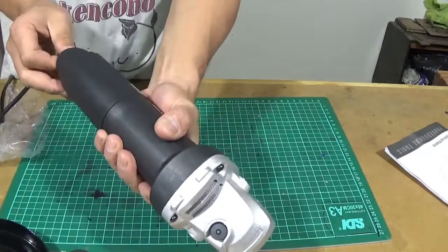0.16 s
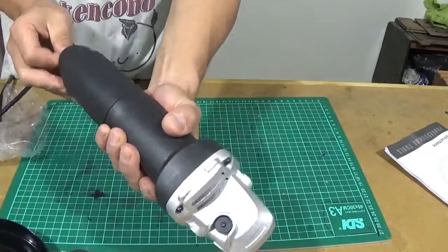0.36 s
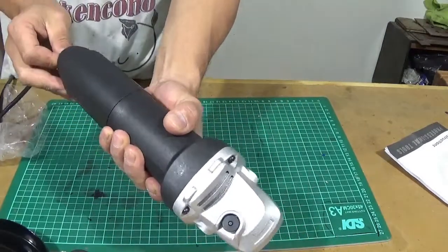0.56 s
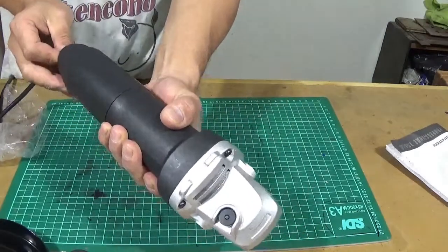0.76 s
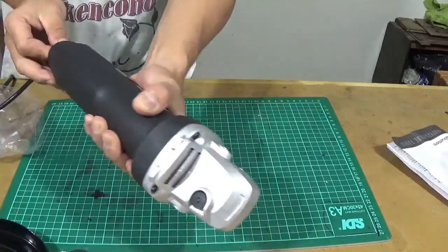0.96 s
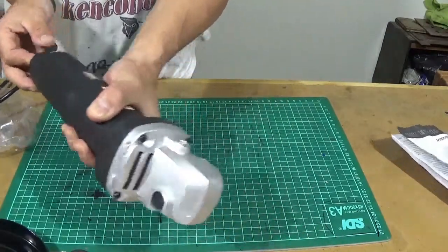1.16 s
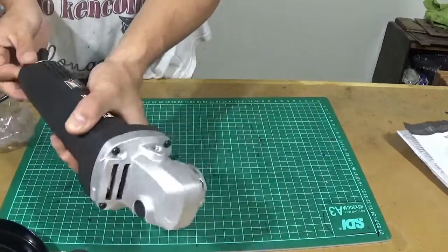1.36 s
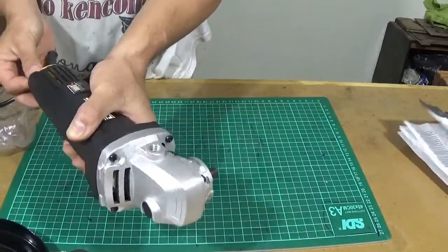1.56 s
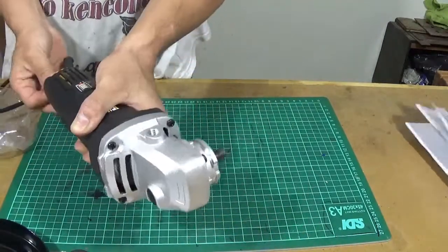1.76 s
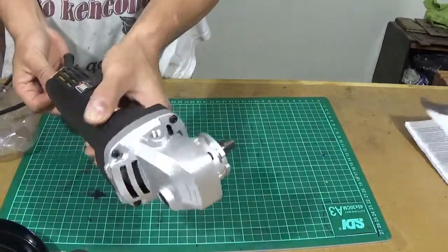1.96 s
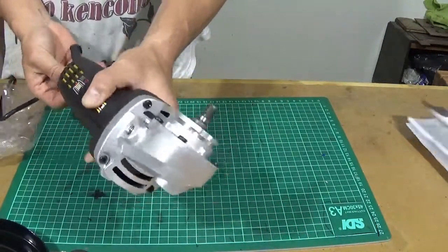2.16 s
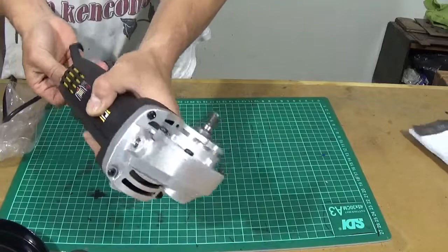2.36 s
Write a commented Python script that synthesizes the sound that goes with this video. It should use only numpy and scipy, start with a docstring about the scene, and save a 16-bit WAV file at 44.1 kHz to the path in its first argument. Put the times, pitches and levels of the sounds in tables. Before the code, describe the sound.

An electric angle grinder without a disc snaps on and runs with a loud rushing whir

```python
"""An angle grinder with no disc is held over a workbench, close to a microphone. The motor runs up and its
speed swings slowly. Fan air and gear chatter, made from noise and random hits, rush through the casing.
Shaft, gear and fan tones follow the speed, and the brushes squeal in time with the mains.
The switch ticks and snaps on before the run; as the tool is turned, its vents puff air at the microphone.
Behind it lie quiet workshop air, a low hum and faint electrical chirps."""
import sys
import numpy as np
from scipy import signal
from scipy.fft import rfft, irfft, next_fast_len
from scipy.io import wavfile
from scipy.ndimage import uniform_filter1d

SR = 44100
rng = np.random.default_rng(int(sys.argv[2]) if len(sys.argv) > 2 else 0)


def wrap_up_sound(samples):
    """Save the sound to the file named by the first command line argument, as 16-bit audio."""
    columns = np.atleast_2d(samples).T
    # keep every value between -1 and 1, then stretch to whole-number steps
    tamed = np.clip(columns, -1, 1)
    steps = np.round(tamed * 32767).astype(np.int16)
    wavfile.write(sys.argv[1], SR, steps)


N = 110250
TIME = np.arange(N) / SR  # seconds

# Switch closing, then power pulsing with the mains
ON_S, PULSE_HZ, PULSE_PEAK_S = 0.3035, 101, .3275
# Extra pulsing of the rush at the start, its fading time, and the pulsing that stays
SURGE_DEPTH, SURGE_S, RUN_DEPTH = 0.74, 0.044, 0.023

# Rush colour with the top of the tool facing the microphone [f/Hz, relative level/dB per Hz]
RUSH_TOP = [(24, -70), (40, -38), (212, -41), (364, -24.5), (400, -27), (543, -16.5), (911, -12.5),
            (1210, -12), (1420, -9), (1880, -8), (2170, -6), (3240, -2.5), (3850, -3), (4400, -6),
            (5500, -4), (6650, -6), (7200, -4.5), (9550, -4.5), (10150, -6), (10900, -9), (14300, -81)]
# Rush colour with the vents facing the microphone [f/Hz, relative level/dB per Hz]
RUSH_VENTS = [(24, -66), (40, -32), (217, -39), (382, -29.5), (543, -17), (810, -18), (978, -14),
              (1460, -11), (1560, -7.5), (1930, -9), (2170, -5.5), (2880, -3.5), (3480, -2), (4300, -2.5),
              (5000, -3.5), (6650, -5), (7400, -1.8), (8500, -5), (9550, -3), (10100, -5), (10900, -9),
              (14300, -52)]
TURN_FROM_S, TURN_TO_S = 1.66, 1.67
# Rush loudness in four bands [t/s, low level/dB, middle level/dB, treble level/dB, top level/dB]
RUSH_LEVELS = [(0.31, -15.5, -27, -24, -35), (.318, -22, -27, -14.5, -24), (.34, -24, -22, -19, -22.5),
               (.37, -22, -17.5, -20, -20), (.44, -21, -20, -21, -17), (.6, -20, -19.5, -19.5, -17),
               (1.0, -21, -20.5, -17.5, -17.5), (1.2, -22.5, -20, -19, -17.5), (1.45, -25, -19.5, -21, -17),
               (1.65, -18, -19.5, -21, -17.5), (1.82, -15.5, -19, -19.5, -17.5),
               (2.0, -18, -18, -19.5, -16.5), (2.25, -17, -20, -18.5, -18.5),
               (2.48, -18.5, -17.5, -20, -17.5)]
# Centres of those four bands [f/Hz]
BAND_HZ = [1000, 3200, 5800, 9000]
# Thinning of the rush in the bass [f/Hz, gain/dB]
RUSH_LOW_CUT = [(100, -11), (250, 1.5), (420, -3), (520, -4.5), (700, 0), (11000, 0)]
# Gear hits: rate, average extra strength, share of the rush power
CHATTER_PER_S, CHATTER_SPREAD_DB, CHATTER_SHARE = 4000, 3, 0.25
FLUTTER_DB, PATCHES_DB = 0.11, 0.87  # rms unsteadiness of the rush: overall, and in patches of colour
# Casing resonances [f/Hz, width/Hz, average level/dB]
CASING = [(700, 19, -57.5), (995, 16, -54.5), (1114, 21, -50.5), (1211.5, 38, -50.5), (1323, 23, -62),
          (1610, 30, -49.5), (2010, 60, -44.5), (2206, 51, -41.5), (2800, 60, -40), (2902, 57, -40),
          (3130, 67, -47), (3665, 71, -41), (3890, 50, -40.5), (4105, 80, -40.5), (4630, 39, -44.5)]
CASING_SWING_DB, CASING_SWING_HZ = 2.5, 4
# Bands of the rush that swell briefly at their own pitches
# [middle t/s, length/s, f/Hz, width/Hz, peak level/dB]
SWELLS = [(0.325, 0.032, 1950, 300, -28), (0.38, 0.042, 3820, 250, -37), (0.49, 0.32, 2960, 352, -29),
          (.56, .1, 6150, 250, -35), (0.61, 0.26, 9320, 600, -29), (0.73, 0.17, 3670, 400, -29),
          (0.822, .08, 6040, 400, -28.5), (.95, .1, 4880, 350, -30), (0.997, .12, 7200, 250, -32),
          (1.07, 0.25, 9830, 400, -36), (1.457, 0.45, 2340, 350, -32), (1.48, 0.18, 9470, 250, -30),
          (1.618, 0.12, 9250, 250, -25.5), (1.77, .11, 4590, 300, -29.5), (1.902, .2, 2980, 252, -36),
          (1.92, 0.28, 3550, 250, -34.5), (1.97, 0.16, 3900, 302, -31), (2.299, 0.038, 3660, 300, -25.5),
          (2.3, .2, 5700, 500, -34)]

# Motor speed [t/s, turns per second/Hz]
SPEED = [(.33, 330), (.42, 420), (.5, 470), (.6, 514), (.66, 538), (.73, 561), (.85, 587), (.95, 603),
         (1.06, 616), (1.2, 580), (1.38, 536), (1.52, 499), (1.63, 480), (1.8, 510), (1.95, 565),
         (2.1, 596), (2.3, 624), (2.5, 626)]
# Overtones of shaft and gears [multiple of the speed, level/dB]
OVERTONES = [(2, -51.5), (3, -48), (4, -52.5), (9, -42), (12, -41)]
# Shaft and fan tones as the tool turns [t/s, shaft level/dB, fan level/dB]
TONE_LEVELS = [(.35, -70, -48), (.55, -55, -43), (.66, -53, -38), (.74, -50, -35.5), (.82, -56, -33),
               (1.07, -55, -32), (1.17, -55, -36), (1.28, -51, -42), (1.38, -52, -43), (1.44, -58, -44),
               (1.52, -53, -44), (1.66, -60, -43), (1.78, -52, -38), (1.86, -54, -37), (1.95, -50, -35),
               (2.1, -56, -37), (2.5, -60, -42)]
SHAFT_JITTER, OVERTONE_ROUGHNESS = 0.0043, 1  # rms share of the speed, rms share of the tone
# Fan: multiple of the speed, width of its noisy tone, strength of its clean tone next to it
FAN_ORDER, FAN_WIDTH_HZ, FAN_STEADY = 6, 80, .7
# Air swirling round the rotor, just above its turning rate; the level holds at the reference speed
SWIRL_DB, SWIRL_RATIO, SWIRL_WIDTH_HZ, SWIRL_REFERENCE_HZ = -56.5, 1.17, 140, 563
RUMBLE_DB, RUMBLE_HZ, RUMBLE_WIDTH_HZ = -74, 35, 57  # rumble of the running motor

# Brush squeal [t/s, level/dB]
SQUEAL = [(.305, -40), (.33, -19), (.35, -27), (.385, -21), (.41, -29), (.47, -32), (.6, -31), (.9, -44)]
# Starting pitch, how far it sags, how quickly, and its rms pitch wobble
SQUEAL_HZ, SQUEAL_SAG_HZ, SQUEAL_SAG_S, SQUEAL_WOBBLE_HZ = 6544, 395, 0.076, 73.4

# Switch ticks and snaps [start t/s, level/dB, ring f/Hz, decay/s]
KNOCKS = [(0.036, -51, 3800, 0.001), (0.1746, -43.5, 6400, 0.0015), (0.1877, -44.5, 6000, 0.0017),
          (.2008, -55, 2060, 0.002), (.2094, -46, 6200, 0.0016), (0.2902, -46, 6600, 0.0016),
          (0.2947, -35, 4000, 0.004), (0.2975, -16, 3500, 0.0012), (0.3026, -17.5, 6800, 0.00088),
          (0.3032, -20.5, 1640, 0.0013)]
# Colour of the noisy crack [f/Hz, relative level/dB]
KNOCK_COLOUR = [(100, -26), (1000, -17), (3000, -2), (5000, 6), (7000, 2), (11000, -7)]
# Thinning of the knocks in the bass [f/Hz, gain/dB]
KNOCK_LOW_CUT = [(150, -30), (400, -16), (1000, -9.5), (11000, 2)]
# Ring strength next to the crack, rms pitch wobble, rise time
KNOCK_RING, KNOCK_WOBBLE_HZ, KNOCK_RISE_S = 1.2, 613, .0009

# Vent air buffeting the microphone [middle t/s, length/s, level/dB]
PUFFS = [(2.16, 0.042, -40.5), (2.206, 0.018, -30), (2.227, 0.014, -28), (2.264, 0.034, -35),
         (2.315, 0.02, -29.5), (2.344, 0.044, -43), (2.407, 0.037, -39.5)]
# Colour of the puffs [f/Hz, relative level/dB]
PUFF_COLOUR = [(30, -36), (70, -21), (130, -8.5), (250, -4.5), (450, -0.5), (650, -8.5), (1200, -12),
               (4000, -62)]
# How alike left and right are in a puff [f/Hz, likeness from 0 to 1]
PUFF_LIKENESS = [(60, 0.86), (140, .7), (260, .1), (700, 0.16)]

# Colour of the quiet workshop air [f/Hz, relative level/dB per Hz]
FLOOR = [(30, -30), (70, -6.5), (105, -4), (150, -15.5), (190, -9.5), (300, -10.5), (660, -11.5),
         (1400, -15), (2500, -15.5), (5000, -20), (11000, -24)]
FLOOR_DB = -62.5
# Hum tones [f/Hz]
HUM_HZ = [113, 184]
# Hum tones before the switch closes [level/dB]
HUM_DB = [-72, -70]
HUM_FADE_DB = -5  # change once the switch is on
# Faint electrical chirps [middle t/s, level/dB]
CHIRPS = [(0.02, -56.5), (.060, -57), (.100, -58), (.141, -56), (.181, -57), (.261, -58)]
CHIRP_HZ, CHIRP_S = 2840, 0.012
# The grip shifts on the body with a soft bump
GRIP_S, GRIP_LENGTH_S, GRIP_HZ, GRIP_DB = 0.233, .04, 110, -61
# The thumb rubs on the switch
RUB_S, RUB_LENGTH_S, RUB_DB = 0.22, .04, -65

# How alike left and right are elsewhere [f/Hz, likeness from 0 to 1]
LIKENESS = [(60, 0.97), (270, 1), (570, 0.79), (1200, 0.94), (2550, 1), (5400, 0.95), (9000, 0.96),
            (11400, 1)]
ROOM_DB, ROOM_T60 = -11.5, 0.29  # T60 in seconds: the time to fall by 60 dB
LAG_S, LEFT_DB, RIGHT_DB, EDGE_HZ = .00002, -0.23, .5, 11090


def amp(db):
    """Turns decibels into a gain."""
    return 10 ** (np.asarray(db) / 20)


def unit(x):
    """Scales to rms 1."""
    return x / np.sqrt(np.mean(x ** 2) + 1e-20)


def read(points, hz):
    """Reads a curve between its points on a log-frequency axis."""
    f, value = np.transpose(points)
    return np.interp(np.log(hz + 1), np.log(f + 1), value)


def filtered(x, gain):
    """Applies a gain that is a function of frequency."""
    size = next_fast_len(N + 8192)
    return irfft(rfft(x, size) * gain(np.fft.rfftfreq(size, 1 / SR)), size)[..., :N]


def coloured(x, points):
    """Gives white noise a colour below the band edge, keeping its power."""
    return filtered(x, lambda hz: unit(amp(read(points, hz)) * (hz < EDGE_HZ)))


def wander(rate_hz):
    """Random wandering of rms 1; a higher rate makes it quicker."""
    return unit(filtered(rng.standard_normal(N), lambda hz: np.exp(-(hz / rate_hz) ** 2)))


def resonate(x, hz, width_hz):
    """A fixed or moving resonance of rms 1: shift down to zero, smooth twice, shift back."""
    turn = np.exp(2j * np.pi * np.cumsum(hz * np.ones(x.shape[-1])) / SR)
    r = np.exp(-np.pi * width_hz / SR)
    smooth = signal.lfilter([(1 - r) ** 2], [1, -2 * r, r * r], x * turn.conj())
    return unit((turn * smooth).real)


def pair(two, likeness=LIKENESS):
    """Mixes two unrelated signals into a partly alike left and right."""
    angle = lambda hz: np.arccos(np.clip(read(likeness, hz), 0, 1)) / 2
    mid = filtered(two[0], lambda hz: np.cos(angle(hz)))
    side = filtered(two[1], lambda hz: np.sin(angle(hz)))
    return np.array([mid + side, mid - side])


def noise_pair():
    """White noise for left and right, partly alike."""
    return pair(rng.standard_normal((2, N)))


def bump(centre_s, length_s):
    """A smooth swell that is length_s wide at half height."""
    return np.cos(np.pi / 2 * np.clip((TIME - centre_s) / length_s, -1, 1)) ** 2


def power(depth):
    """Off until the switch closes, then pulsing with the mains."""
    switched_on = np.clip((TIME - ON_S) / 0.0023, 0, 1)
    return switched_on * (1 + depth * np.cos(2 * np.pi * PULSE_HZ * (TIME - PULSE_PEAK_S)))


def rush():
    """Fan turbulence and chattering gear teeth, pulsing most at the start, coloured and rung by the casing."""
    strength = amp(CHATTER_SPREAD_DB * np.minimum(rng.exponential(1, (2, N)), 4))
    hits = (rng.random((2, N)) < CHATTER_PER_S / SR) * strength
    chatter = unit(hits * rng.choice([-1, 1], (2, N)))
    turbulence = rng.standard_normal((2, N))
    mixed = np.sqrt(CHATTER_SHARE) * chatter + np.sqrt(1 - CHATTER_SHARE) * turbulence

    surge = RUN_DEPTH + SURGE_DEPTH * np.exp(-np.maximum(TIME - ON_S, 0) / SURGE_S)
    effort = power(surge) * amp(FLUTTER_DB * wander(rate_hz=39))
    drive = effort * pair(mixed)
    turned = np.interp(TIME, [TURN_FROM_S, TURN_TO_S], [0, 1])
    facing = (1 - turned) * coloured(drive, RUSH_TOP) + turned * coloured(drive, RUSH_VENTS)

    s, *levels = np.transpose(RUSH_LEVELS)
    air = 0
    for db, band in zip(levels, np.eye(len(BAND_HZ))):  # overlapping bands that add up to the whole
        shape = lambda hz: amp(read(RUSH_LOW_CUT, hz)) * np.interp(hz, BAND_HZ, band)
        air += amp(np.interp(TIME, s, db)) * filtered(facing, shape)

    shaking = effort * noise_pair()
    rings = sum(amp(db + CASING_SWING_DB * wander(CASING_SWING_HZ)) * resonate(shaking, hz, width)
                for hz, width, db in CASING)
    draught = effort * noise_pair()
    swells = sum(amp(db) * bump(s, length) * resonate(draught, hz, width)
                 for s, length, hz, width, db in SWELLS)
    return patchy(air) + rings + swells


def patchy(x):
    """The rush's colour shifts in random patches of time and pitch."""
    z = signal.stft(x, nperseg=256, noverlap=192)[2]
    patches = rng.standard_normal(z.shape[1:])
    patches = uniform_filter1d(patches, size=2, axis=0)  # over pitch
    patches = unit(uniform_filter1d(patches, size=90, axis=1))  # over time
    return signal.istft(z * amp(PATCHES_DB * patches), nperseg=256, noverlap=192)[1][:, :N]


def whine():
    """Shaft, gear and fan tones follow the speed; air swirls round the rotor and the motor rumbles."""
    speed = np.interp(TIME, *np.transpose(SPEED))
    s, shaft_db, fan_db = np.transpose(TONE_LEVELS)
    turns = np.cumsum(speed * (1 + SHAFT_JITTER * wander(rate_hz=57.0))) / SR

    def tone(order, rough):
        """One tone at a multiple of the speed, with unsteady loudness."""
        wave = np.cos(2 * np.pi * (order * turns + rng.random()))
        return unit(wave * (1 + rough * wander(rate_hz=21)))

    shaft = sum(amp(db) * tone(order, OVERTONE_ROUGHNESS) for order, db in OVERTONES)
    shaft = shaft + tone(1, rough=0.98) * amp(np.interp(TIME, s, shaft_db))
    noisy_fan = resonate(rng.standard_normal(N), FAN_ORDER * speed, FAN_WIDTH_HZ)
    fan = noisy_fan + FAN_STEADY * tone(FAN_ORDER, rough=0.58)
    fan = fan * amp(np.interp(TIME, s, fan_db))
    swirl = pair(resonate(rng.standard_normal((2, N)), SWIRL_RATIO * speed, SWIRL_WIDTH_HZ))
    swirl = amp(SWIRL_DB) * swirl * (speed / SWIRL_REFERENCE_HZ) ** 2
    rumble = amp(RUMBLE_DB) * resonate(rng.standard_normal(N), RUMBLE_HZ, RUMBLE_WIDTH_HZ)
    return (shaft + fan + swirl + rumble) * power(0)


def squeal():
    """The brushes squeal under the starting current, sagging in pitch as they fade."""
    sag = 1 - np.exp(-np.maximum(TIME - ON_S, 0) / SQUEAL_SAG_S)
    hz = SQUEAL_HZ - SQUEAL_SAG_HZ * sag + SQUEAL_WOBBLE_HZ * wander(rate_hz=175)
    tone = np.sqrt(2) * np.sin(2 * np.pi * np.cumsum(hz) / SR)
    return tone * amp(np.interp(TIME, *np.transpose(SQUEAL))) * power(depth=0.74)


def knocks():
    """The slide switch ticks under the thumb, then snaps home: a noisy crack and a ring that die away."""
    out = np.zeros((2, N))
    crack = coloured(noise_pair(), KNOCK_COLOUR)
    wobble = KNOCK_WOBBLE_HZ * wander(rate_hz=1600)
    for s, db, hz, decay in KNOCKS:
        age = np.maximum(TIME - s, 0)
        ring = np.sqrt(2) * np.sin(2 * np.pi * np.cumsum(hz + wobble) / SR)
        rise = np.minimum(age / KNOCK_RISE_S, 1)
        fall = np.exp(-np.maximum(age - KNOCK_RISE_S, 0) / decay)
        out += amp(db) * rise * fall * (crack + KNOCK_RING * ring)
    return filtered(out, lambda hz: amp(read(KNOCK_LOW_CUT, hz)))


def puffs():
    """Cooling air hits the microphone ports: together in the bass, separately above."""
    gust = coloured(pair(rng.standard_normal((2, N)), PUFF_LIKENESS), PUFF_COLOUR)
    return gust * sum(amp(db) * bump(s, length) for s, length, db in PUFFS)


def room(x):
    """A short tail of sparse, fading reflections from bench and walls."""
    t = np.arange(SR // 3) / SR
    sparse = rng.random((2, len(t))) < 2000 / SR  # about 2000 reflections a second
    taps = rng.standard_normal((2, len(t))) * sparse * (t > .003) * amp(-60 * t / ROOM_T60)
    taps = taps / np.linalg.norm(taps, axis=1, keepdims=True)
    return signal.fftconvolve(x, taps, axes=1)[:, :N]


def background():
    """Quiet workshop air, a hum that drops at switch-on, the shifting grip, the thumb and faint chirps."""
    air = amp(FLOOR_DB) * coloured(noise_pair(), FLOOR)
    hum = sum(amp(db) * unit(np.sin(2 * np.pi * hz * TIME) * (1 + 0.33 * wander(rate_hz=31)))
              for hz, db in zip(HUM_HZ, HUM_DB))
    hum = hum * amp(HUM_FADE_DB * power(0))
    grip = resonate(rng.standard_normal(N), GRIP_HZ, width_hz=51)
    grip = amp(GRIP_DB) * grip * bump(GRIP_S, GRIP_LENGTH_S)
    rub = amp(RUB_DB) * coloured(rng.standard_normal(N), KNOCK_COLOUR) * bump(RUB_S, RUB_LENGTH_S)
    chirp_swells = sum(amp(db) * bump(s, CHIRP_S / 2) for s, db in CHIRPS)
    chirps = np.sqrt(2) * np.sin(2 * np.pi * CHIRP_HZ * TIME) * chirp_swells
    return air + hum + grip + rub + chirps


def scene():
    """The grinder in its room, with the air it blows and the background."""
    tool = rush() + whine() + squeal() + knocks()
    return tool + amp(ROOM_DB) * room(tool) + puffs() + background()


def record(dry):
    """The left port hears a little later and softer; then the treble is cut above the band edge."""
    left = amp(LEFT_DB) * filtered(dry[0], lambda hz: np.exp(-2j * np.pi * hz * LAG_S))
    right = amp(RIGHT_DB) * dry[1]
    low_pass = signal.firwin(801, EDGE_HZ, window=("kaiser", 9), fs=SR)
    return signal.oaconvolve(np.array([left, right]), low_pass[None], "same")


dry = scene()
out = record(dry)
wrap_up_sound(out)
```